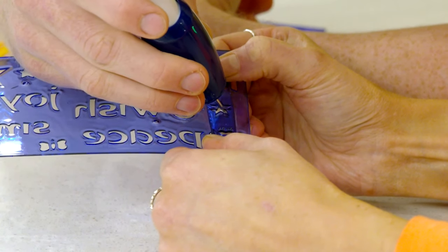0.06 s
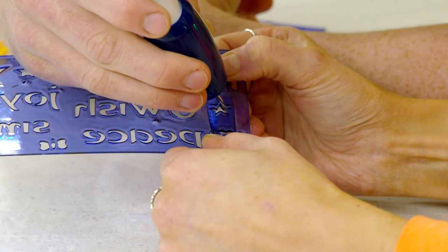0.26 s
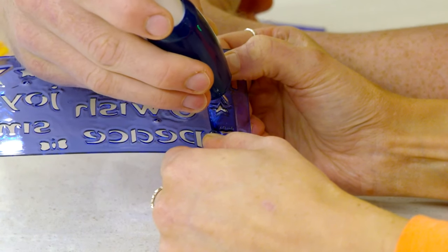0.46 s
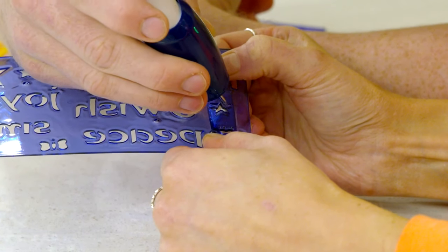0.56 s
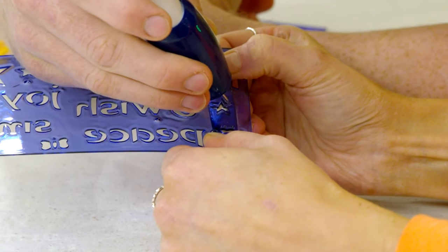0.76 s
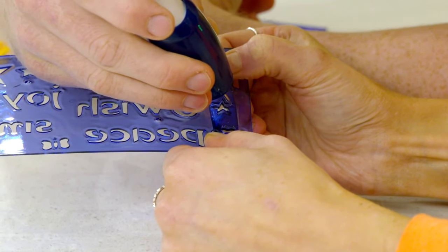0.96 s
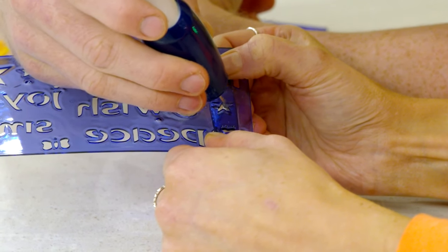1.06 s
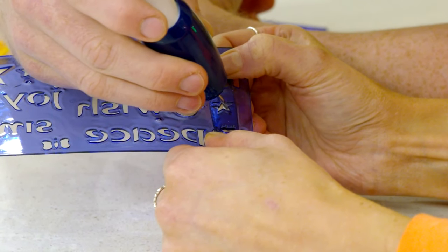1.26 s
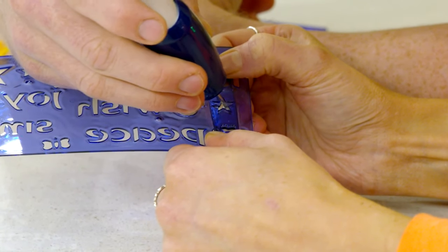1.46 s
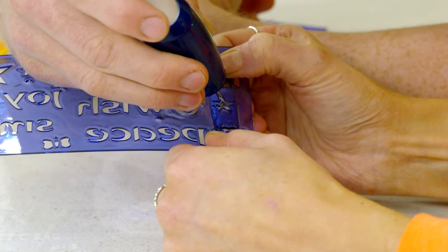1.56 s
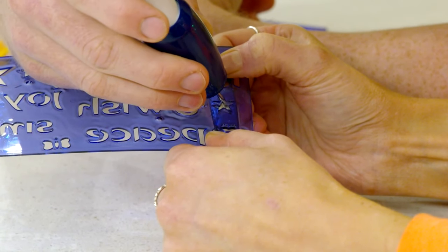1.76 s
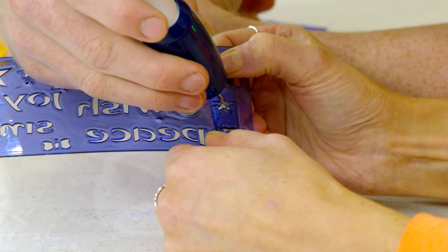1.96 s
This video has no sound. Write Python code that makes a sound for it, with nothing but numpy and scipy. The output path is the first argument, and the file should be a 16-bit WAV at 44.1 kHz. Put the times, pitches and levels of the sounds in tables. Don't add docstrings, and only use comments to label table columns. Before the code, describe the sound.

Small electric engraver rattling steadily against metal, harsh buzz wavering with hissing, scratchy to-and-fro strokes

```python
import sys
import numpy as np
from scipy import signal
from scipy.fft import rfft, irfft, next_fast_len
from scipy.io import wavfile
from scipy.ndimage import uniform_filter1d, map_coordinates

SR = 44100
rng = np.random.default_rng(int(sys.argv[2]) if len(sys.argv) > 2 else 0)


def natural_amplitude(level_db):
    exponent = np.asarray(level_db, float) / 20
    return 10 ** exponent


def to_wav(s):
    ch = np.atleast_2d(s).T
    pcm = np.round(np.clip(ch, -1, 1) * 32767)
    wavfile.write(sys.argv[1], SR, pcm.astype(np.int16))


N = 89258

# f/Hz, density/dB per Hz
RUMBLE_COLOUR = [(15, -12), (25, 4), (38, -12), (70, 4.5), (113, -4.5), (170, -12.5), (220, -43),
                 (370, -120)]
# t/s, speed/turns per s
SHAFT_SPEED = [(0.03, 251), (0.57, 234), (0.65, 243), (0.68, 227), (0.76, 208), (0.86, 232), (0.92, 207),
               (0.96, 202), (1.09, 232), (1.19, 206), (1.315, 235), (1.36, 211), (1.42, 192), (1.54, 221),
               (1.65, 188), (1.74, 212), (1.87, 184), (1.95, 206)]
# t/s, knock level/dB, grit level between skids/dB
HAND_PRESSURE = [(0.0, -34, -41), (0.07, -34, -41), (0.56, -34, -39.5), (0.62, -37.5, -47.5),
                 (0.66, -32.5, -38), (0.83, -36.5, -75), (0.89, -33.5, -47.5), (1.03, -36.5, -37),
                 (1.34, -35.5, -47), (1.49, -35, -36), (1.56, -35.5, -40.5), (1.61, -38, -37.5),
                 (1.7, -36.5, -55), (2.02, -35.5, -37.5)]
# order/multiple of speed, level/dB rms, gain on cutting stroke (lost on return)/dB
HUM_ORDERS = [(1, -57, 1), (2, -59, -1.5), (3, -56, -3.5), (4, -57.5, 4), (5, -59, -1.5), (6, -55.5, 5.5),
              (7, -55, 4.5)]
# t/s, length/s
GRIP_EASES = [
    (0.327, 0.023),
    (0.52, 0.0039),
    (1.03, 0.016),
    (1.5, 0.02),
    (1.678, 0.026),
    (1.873, 0.064),
]
# t/s, extra knock/dB, decay/s
BUR_BITES = [(.235, 3.5, 0.036), (.39, 2.5, .02), (.537, 2, 0.011), (.662, 5.5, .04), (.868, 4, 0.067),
             (.95, 4.5, .03), (1.145, 7.5, 0.012), (1.322, 7, .035), (1.534, 9.5, 0.005), (1.552, 8, 0.046),
             (1.752, 5.5, 0.014), (1.98, 3, 0.027)]
# f/Hz, width/Hz, level/dB
SHELL_MODES = [(1416, 550, -14), (1736, 70, -1), (2170, 640, -7.5), (2416, 53, 4), (2580, 80, 1),
               (3234, 55, 1), (3243, 193, -7), (3853, 44, -6)]
# f/Hz, density/dB per Hz
THUD_COLOUR = [(700, -63), (1100, -38), (1500, -13), (2000, 1), (2500, 3), (3100, 0.5), (3900, -9),
               (5500, -40)]
# f/Hz, density/dB per Hz
RASP_COLOUR = [(150, -12), (300, -15.5), (550, -14.5), (800, -9), (1500, -6), (2600, -1.5), (4540, -6.5),
               (10600, -13), (15100, -33)]
# start t/s, length/s, level/dB
GRIT_SKIDS = [(0.032, 0.025, -39.5), (0.302, 0.021, -43), (0.428, 0.044, -40.5), (0.481, 0.035, -42.5),
              (0.639, 0.13, -38), (0.789, 0.04, -29.5), (0.844, 0.053, -34), (0.919, 0.046, -37),
              (0.979, 0.048, -40), (1.079, 0.06, -39), (1.234, 0.039, -34.5), (1.287, 0.031, -38.5),
              (1.31, 0.044, -36.5), (1.368, 0.026, -34.5), (1.494, 0.05, -37.5), (1.684, 0.035, -38),
              (1.725, 0.067, -33), (1.94, 0.019, -38)]
# f/Hz, width/Hz, level/dB
STEEL_MODES = [(5400, 220, -6), (6750, 250, -8), (7380, 200, -11), (7900, 250, -11), (9700, 300, -9.5),
               (11430, 130, -2.5), (11940, 190, -.5), (13070, 120, -5), (13430, 140, -4), (14200, 220, -6),
               (14830, 200, -5)]
# f/Hz, density/dB per Hz
FIZZ_COLOUR = [(4000, -40), (5000, -17), (7000, -14), (10300, -12), (11500, -3), (12500, 0), (15100, 0)]

RUMBLE_DB = -66
STROKE_TURNS_PER_S2 = 120
HUM_DB, EASE_DB, HUM_WAVER_DB, HUM_WAVER_PER_S = 1.5, -13, 4, 30
JITTER_S, SCATTER_DB = 0.000025, 1.6
REBOUND_TURN, REBOUND_WANDER_TURN, REBOUND_DB = 0.4308, 0.0468, -2.5
BITE_RISE_S, SHELL_BITE, THUD_BITE = 0.008, 0.47, 1.83
KNOCK_DB, THUD_DB, THUD_REBOUND_DB, CHATTER_DB, RASP_DB = -6.5, -10.5, -0.5, -9, -5.5
GRAINS_PER_S, GRAIN_DB, SKID_EDGE = 12000, 3, 2.2
GRIT_DB, FIZZ_DB, FLUTTER_DB = -1.5, -5, 1.3
LOW_DB, LOW_FOLLOWS = -6.5, 0.79
ROOM_T60_S, ROOM_DB = 0.1, -12


def unit(x):
    return x / np.sqrt(np.mean(x ** 2) + 1e-20)


def wobble(knots_per_s):
    return map_coordinates(rng.standard_normal(400), [np.arange(N) * min(knots_per_s, 150) / SR])


def filtered(x, response):
    size = next_fast_len(N + 8192)
    return irfft(rfft(x, size) * response(np.fft.rfftfreq(size, 1 / SR)), size)[..., :N]


def colour(points):
    f, db = np.transpose(points)
    return lambda hz: natural_amplitude(np.interp(np.log(hz + 1), np.log(f + 1), db, -120, -120))


def body(modes, turn=-1):
    def response(f):
        total = 0
        for k, (centre, width, db) in enumerate(modes):
            damping = 1j * f * width
            total = total + turn ** k * natural_amplitude(db) * damping / (centre * centre - f * f + damping)
        return total
    return response


def rumble():
    return natural_amplitude(RUMBLE_DB) * unit(filtered(rng.standard_normal(N), colour(RUMBLE_COLOUR)))


def motor():
    def read(rows, column):
        points = np.transpose(rows)
        return uniform_filter1d(np.interp(np.arange(N) / SR, points[0], points[column]), size=700)
    turns_per_s = read(SHAFT_SPEED, 1) * (1 + 0.003 * wobble(30))
    return np.cumsum(turns_per_s) / SR, read(HAND_PRESSURE, 1), read(HAND_PRESSURE, 2)


def hum(turns):
    t = np.arange(N) / SR
    ease_db = EASE_DB * sum(np.exp(-((t - s) / length) ** 2) for s, length in GRIP_EASES)
    speed_t, speed = np.transpose(SHAFT_SPEED)
    slowing = -np.gradient(np.interp(t, speed_t, speed)) * SR / STROKE_TURNS_PER_S2
    stroke = uniform_filter1d(np.tanh(slowing), size=900)
    total = np.zeros(N)
    for k, db, swing_db in HUM_ORDERS:
        waver_db = HUM_WAVER_DB * min(k / 3, 1) * wobble(HUM_WAVER_PER_S)
        level_db = HUM_DB + db + swing_db * stroke + ease_db / k ** 2 + waver_db
        phase = k * turns + 0.08 * wobble(35) + rng.random()
        total += natural_amplitude(level_db) * np.sin(2 * np.pi * phase)
    return total


def taps(turns):
    luck = rng.standard_normal((500, 2))
    at = np.interp(np.arange(len(luck)), turns, np.arange(N), right=N + 40)
    at = at + JITTER_S * SR * luck[:, 0]
    near = np.round(at)[:, None] + np.arange(-8, 9)
    shape = np.sinc(near - at[:, None]) * np.hanning(19)[1:-1]
    shape = shape * natural_amplitude(SCATTER_DB * luck[:, 1:])
    return np.bincount(np.clip(near, 0, N).astype(int).ravel(), shape.ravel(), N + 1)[:N]


def knocks(turns, knock_db):
    t = np.arange(N) / SR
    bite_db = np.zeros(N)
    for s, db, fall_s in BUR_BITES:
        bite_db += db * np.exp(np.where(t < s, (t - s) / BITE_RISE_S, (s - t) / fall_s))
    late = REBOUND_TURN + REBOUND_WANDER_TURN * wobble(13)
    first, second = taps(turns), taps(turns - late)
    shell = unit(filtered(first + natural_amplitude(REBOUND_DB) * second, body(SHELL_MODES)))
    thud = unit(filtered(first + natural_amplitude(THUD_REBOUND_DB) * second, colour(THUD_COLOUR)))
    struck = natural_amplitude(KNOCK_DB + SHELL_BITE * bite_db) * shell + natural_amplitude(THUD_DB + THUD_BITE * bite_db) * thud
    gate = 1 + 0.15 * np.cos(2 * np.pi * turns)
    chatter, rasp = gate * natural_amplitude(2.46 * wobble(28.9)) * rng.standard_normal((2, N))
    chatter = natural_amplitude(CHATTER_DB) * unit(filtered(chatter, body(SHELL_MODES)))
    rasp = natural_amplitude(RASP_DB) * unit(filtered(rasp, colour(RASP_COLOUR)))
    return natural_amplitude(knock_db) * (struck + chatter + rasp)


def grit(turns, grit_db):
    t = np.arange(N) / SR
    skid = np.zeros(N)
    for s, length, db in GRIT_SKIDS:
        skid += natural_amplitude(db) * np.exp(-np.abs((t - s - length / 2) / (0.5 * length)) ** SKID_EDGE)
    level = natural_amplitude(grit_db) + skid
    chance, sign, size = rng.random((3, N))
    grains = (chance < GRAINS_PER_S / SR) * np.sign(sign - 0.5)
    grains = grains * natural_amplitude(-GRAIN_DB * np.log(size + 1e-9))
    grains = grains * (1 + 0.45 * np.cos(2 * np.pi * turns))
    upper = unit(filtered(grains, body(STEEL_MODES[4:], turn=1)))
    fizz = natural_amplitude(FIZZ_DB + wobble(40.3)) * unit(filtered(grains[::-1], colour(FIZZ_COLOUR)))
    lower = unit(filtered(np.roll(grains, N // 2), body(STEEL_MODES[:4], turn=0.94)))
    lower = natural_amplitude(LOW_DB + 1.2 * wobble(17.8)) * lower
    low_level = level.mean() * (level / level.mean()) ** LOW_FOLLOWS
    return natural_amplitude(GRIT_DB) * (natural_amplitude(FLUTTER_DB * wobble(75.1)) * level * (upper + fizz) + low_level * lower)


def room(x):
    t = np.arange(SR // 4) / SR
    tail = rng.standard_normal(len(t)) * natural_amplitude(-60 * t / ROOM_T60_S) * (t > 0.003)
    return x + natural_amplitude(ROOM_DB) * signal.fftconvolve(x, tail / np.linalg.norm(tail))[:N]


def scene():
    turns, knock_db, grit_db = motor()
    pen = room(knocks(turns, knock_db) + grit(turns, grit_db)) + hum(turns)
    mono = pen + rumble()
    return np.array([mono, mono])


def top_cut(x):
    return signal.sosfilt(signal.butter(12, 16100, fs=SR, output="sos"), x)


def record(dry):
    mix = filtered(dry, lambda hz: hz < 15020)
    return top_cut(mix)


dry = scene()
out = record(dry)
to_wav(out)
```